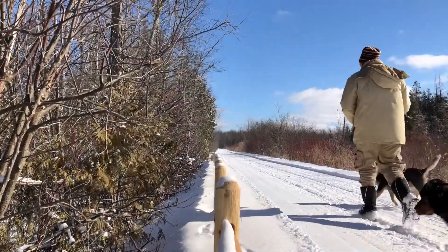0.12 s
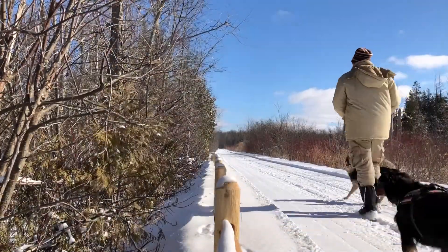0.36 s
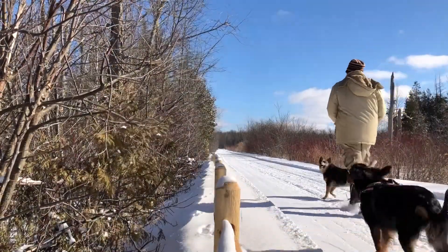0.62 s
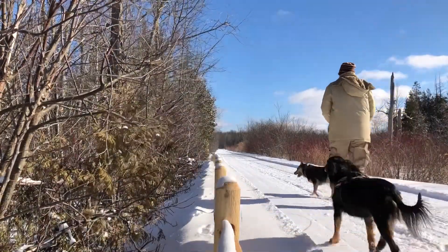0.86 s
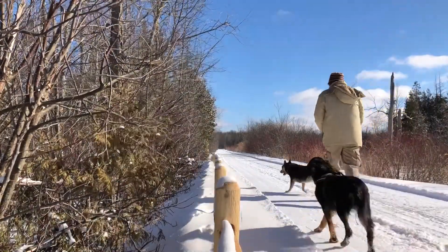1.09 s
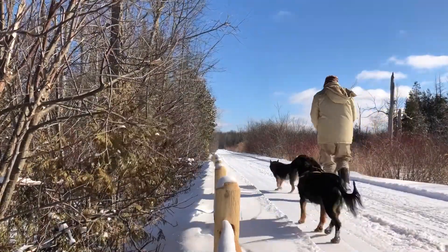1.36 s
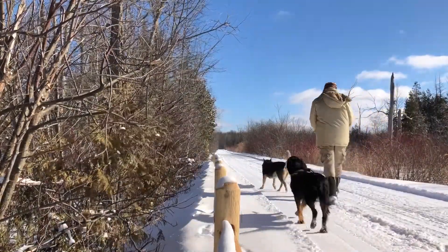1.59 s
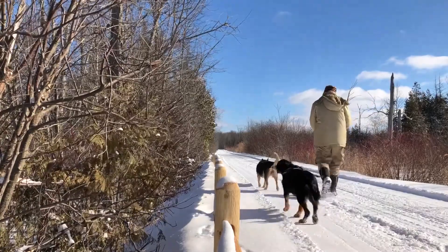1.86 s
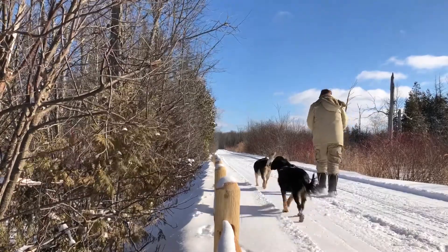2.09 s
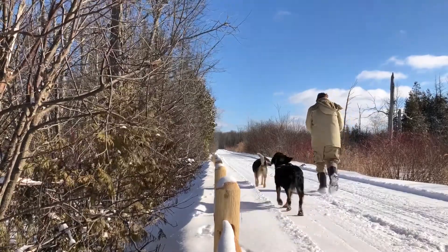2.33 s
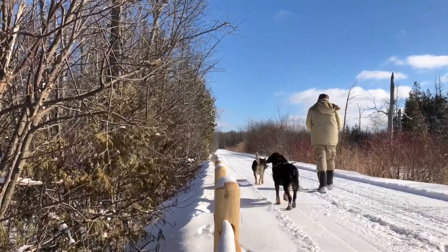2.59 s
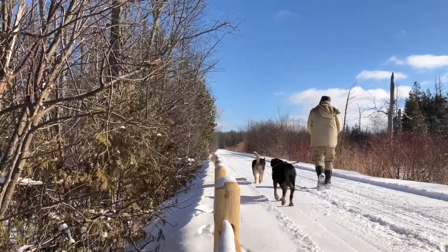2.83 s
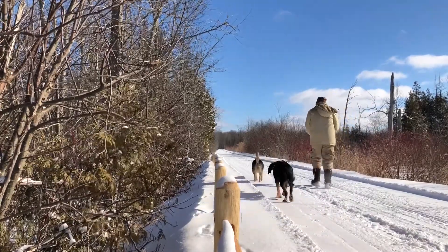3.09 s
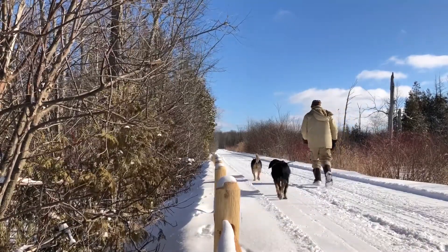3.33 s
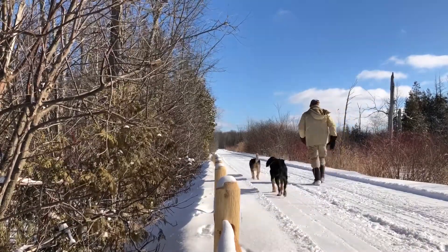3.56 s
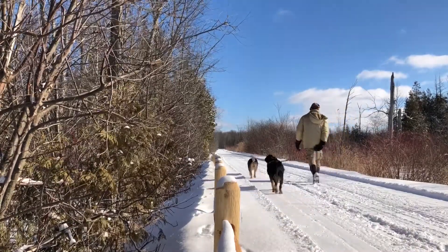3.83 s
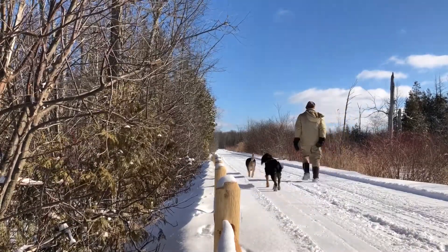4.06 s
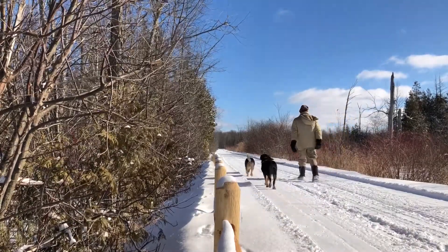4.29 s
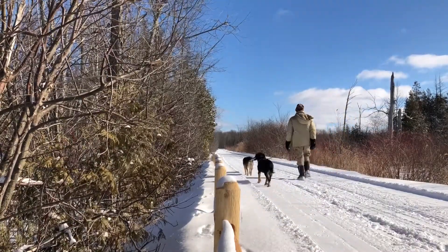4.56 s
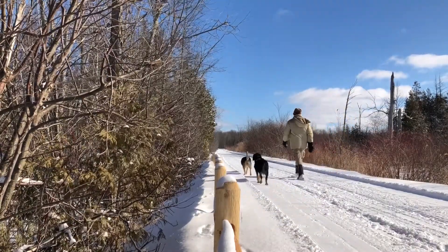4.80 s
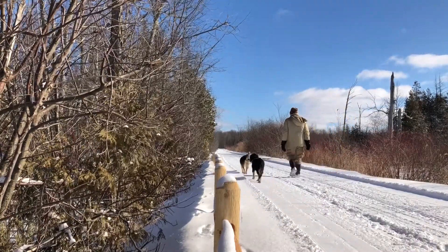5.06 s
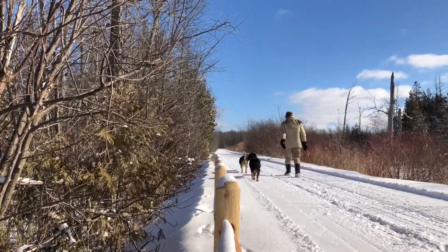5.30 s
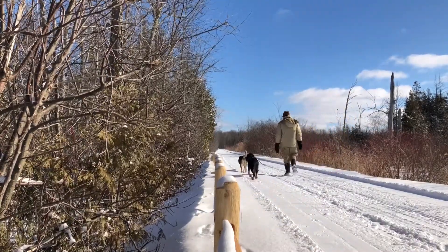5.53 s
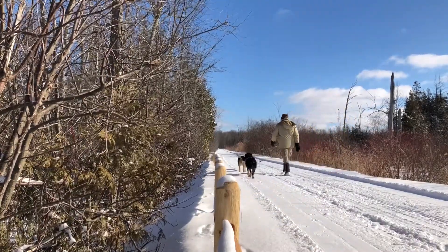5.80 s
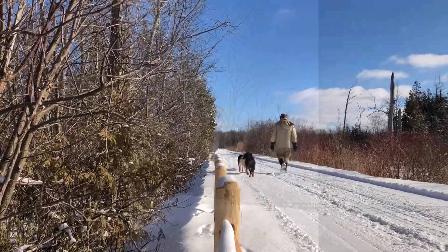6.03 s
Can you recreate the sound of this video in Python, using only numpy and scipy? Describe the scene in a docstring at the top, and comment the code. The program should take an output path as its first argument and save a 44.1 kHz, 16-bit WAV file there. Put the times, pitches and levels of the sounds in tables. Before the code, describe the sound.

A walker and two dogs pass and head away over packed snow: crisp crunches, a slight squeak, cloth and snow rustle, and delicate high metallic jingling close at first. Irregular low wind gusts thud and crackle directly on the microphone, often covering the steps, strongest in the middle. After four seconds the wind eases and distant footfalls remain as faint ticks in open air, with one last soft gust.

```python
"""Windy walk with two dogs

Gusty wind rumbles and slaps a hand-held microphone beside a snowy trail: filtered noise plus short swirling tones.
A walker and two dogs move away: noise bursts crunch like packed snow and rough tones squeak.
Their coats and kicked snow rustle as grainy noise that fades unevenly, and decaying high tones jingle as collar tags.
A soft, steady noise behind it all is the outdoor hush."""
import sys
import numpy as np
from scipy import signal
from scipy.io import wavfile
from scipy.ndimage import uniform_filter1d, minimum_filter1d

SR = 44100
rng = np.random.default_rng(int(sys.argv[2]) if len(sys.argv) > 2 else 0)


def convert_level_to_amplitude(level_db):
    """Map a level in decibels to its linear amplitude factor."""
    exponent = np.asarray(level_db, float) / 20
    return 10 ** exponent


def bounce(signal):
    """Save signal as a 16-bit WAV file at the path given by the first command-line argument."""
    frames = np.transpose(np.atleast_2d(signal))
    limited = np.clip(frames, -1, 1)
    pcm = np.round(limited * 32767).astype(np.int16)
    wavfile.write(sys.argv[1], SR, pcm)


N = 271479  # length in samples

# Steady wind flow at the microphone port. Each row: time in seconds, rumble level in dB.
BREEZE = [(0.0, -45.5), (0.1, -33.5), (0.65, -33), (0.98, -43.5), (1.15, -29.5), (1.6, -27), (1.78, -40.5),
          (1.9, -29.5), (2.06, -40.5), (2.3, -29), (2.74, -32), (3.0, -30), (3.27, -35.5), (3.62, -31.5),
          (3.88, -42.5), (4.5, -47), (5.0, -48), (5.35, -43.5), (5.57, -59), (5.85, -37), (6.16, -59)]


def evened(x):
    """Scales a sound to an average (rms) strength of 1."""
    return x / np.sqrt(np.mean(x ** 2) + 1e-20)


def read(points, hz):
    """Reads a spectrum at hz, with straight lines on a logarithmic frequency axis."""
    f, value = np.transpose(points)
    return np.interp(np.log(hz + 1), np.log(f + 1), value)


def add(mix, s, sound):
    """Adds a sound to the mix at s seconds, cut off where the mix ends."""
    part = mix[round(s * SR):][:len(sound)]
    part += sound[:len(part)]


def noise(points, size, patchy_db=0.0, grain=None):
    """Gives noise, or a given train of grains, a spectrum with drifting louder and softer patches; rms 1."""
    x = rng.standard_normal(N) if grain is None else grain
    hz, _, z = signal.stft(x, SR, nperseg=size, noverlap=size * 3 // 4)
    patches = uniform_filter1d(rng.standard_normal(z.shape), size=6, axis=0)
    patches = uniform_filter1d(patches, size=6, axis=1)
    z = z * convert_level_to_amplitude(read(points, hz)[:, None] + patchy_db * evened(patches))
    shaped = signal.istft(z, SR, nperseg=size, noverlap=size * 3 // 4)[1]
    return evened(shaped[:N])


def lumps(seconds, depth_db):
    """Makes a random loudness curve that swells over about the given time; rms 1."""
    width = max(round(seconds * SR), 2)
    swell = uniform_filter1d(uniform_filter1d(rng.standard_normal(N), width), width)
    return evened(convert_level_to_amplitude(depth_db * evened(swell)))


def swells(rows):
    """Adds up the power of bell-shaped swells, for a main layer and the brighter one that goes with it."""
    t = np.arange(0, N + 64, 64) / SR  # a coarse time grid is enough for these slow curves
    power = 0
    for s, db, half, bright_db in rows:
        bell = np.exp(-2 * ((t - s) / max(half, 0.003)) ** 2)
        power = power + convert_level_to_amplitude([[db], [db + bright_db]]) ** 2 * bell
    return [np.interp(np.arange(N) / SR, t, row) for row in power]


def wind():
    """Slow eddies of air rumble; fast ones come in lumps and grow quickly as the flow strengthens."""
    # Spectra of the two kinds of eddy. Each row: frequency in Hz, relative level in dB.
    slow_eddies = [(12, -43.5), (20, -28), (49, 0), (98, -2), (195, -14.5), (300, -29), (338, -33),
                   (500, -56), (650, -58), (1100, -120)]
    fast_eddies = [(59, -38), (100, -6.5), (197, -4.5), (407, -5.5), (447, -13.5), (481, -4), (539, -16),
                   (1200, -42), (1560, -76.5), (2640, -120)]
    # Gusts over the breeze. Each row: peak time in seconds, rumble level in dB, half length in seconds,
    # fast eddies relative to the rumble in dB.
    gusts = [(0.18, -28.5, 0.022, -16), (0.27, -34, 0.016, -12), (0.375, -20, 0.01, -17),
             (0.75, -29, 0.024, 3.5), (0.82, -23, 0.037, -8), (0.89, -30.5, 0.017, 3),
             (0.93, -22.5, 0.017, -16), (1.01, -29.5, 0.021, -15), (1.085, -22, 0.015, -17),
             (1.29, -22, 0.048, -6), (1.43, -23.5, 0.032, 0), (1.53, -24, 0.045, -3.5),
             (1.6, -44, 0.045, 5), (1.67, -25, 0.045, -11.5), (1.83, -22.5, 0.031, -21),
             (1.96, -20.5, 0.026, -41), (2.17, -27, 0.066, -11), (2.39, -26.5, 0.053, -8),
             (2.65, -23.5, 0.052, -12.5), (2.8, -22.5, 0.035, -16), (2.9, -25, 0.047, -16),
             (3.13, -14, 0.022, -9.5), (3.23, -25, 0.023, -8), (3.37, -16, 0.051, -16),
             (3.52, -20, 0.051, -21), (3.725, -16.5, 0.02, -18), (3.8, -26, 0.03, -25),
             (3.91, -28, 0.015, -30), (4.09, -37.5, 0.018, -25), (4.21, -29.5, 0.021, -28),
             (4.33, -37.5, 0.085, -38), (4.56, -31.5, 0.024, -29), (4.73, -34.5, 0.084, -30),
             (5.19, -38.5, 0.11, -43), (5.94, -30.5, 0.073, -27), (6.09, -35.5, 0.039, -34)]
    breeze_db = np.interp(np.arange(N) / SR, *np.transpose(BREEZE))
    slow_gust, fast_gust = swells(gusts)
    fast_db = -52 + 1.7 * (breeze_db + 35)  # -52 dB at a rumble of -35 dB, then 1.7 dB per dB of rumble
    slow_strength = np.sqrt(convert_level_to_amplitude(breeze_db) ** 2 + slow_gust)
    fast_strength = np.sqrt(convert_level_to_amplitude(fast_db) ** 2 + fast_gust)
    slow = noise(slow_eddies, size=8192) * lumps(0.048, 0.89) * slow_strength
    fast = noise(fast_eddies, size=4096) * lumps(0.008, 4) * fast_strength
    return slow + fast


def slaps(rows, count=16):
    """Each eddy arrives fast and slows down: a thin sharp edge first, then a longer, heavier body."""
    # Where body, middle and edge of a slap lie. A single row: their three frequencies in Hz.
    slap_hz = (204, 528.7, 1465)
    body_hz, middle_hz, edge_hz = slap_hz
    lead = 0.02  # seconds kept free ahead of the slap
    out = np.zeros(N)
    t = np.arange(3000) / SR - lead
    chance = rng.random((len(rows), 3, count, 1))
    for (s, db, body_db, edge_db), (tune, phase, scatter) in zip(rows, chance):
        # swirls spread over 140 to 2900 Hz in equal musical steps
        hz = 140 * (2900 / 140) ** ((np.arange(count)[:, None] + tune) / count)
        slope = [(body_hz, body_db), (middle_hz, 0), (edge_hz, edge_db), (2 * edge_hz, 2.8 * edge_db)]
        span = 0.0032 * (middle_hz / hz) ** 0.64  # seconds; big swirls last longer
        lag = 0.00316 * (middle_hz / hz - 1) + 0.5 * span * (scatter - 0.5)  # seconds; low swirls come later
        tone = np.sin(2 * np.pi * (hz * (t - lag) + 0.63 * phase))
        swirls = convert_level_to_amplitude(read(slope, hz)) * np.exp(-((t - lag) / span) ** 2) * tone
        add(out, s - lead, convert_level_to_amplitude(db) * swirls.sum(0))
    return out


def strong_buffets():
    """Single strong eddies slap the microphone port at set moments."""
    # Each row: time in seconds, level in dB, low body relative to the middle in dB,
    # high edge relative to the middle in dB.
    strong_eddies = [(0.0883, -40, 4.5, -35), (0.1244, -45, 15, -28), (0.2804, -31, 4, -39),
                     (0.3523, -45.5, 18, -29), (0.3703, -40, -10, -39), (0.4545, -36.5, 8.5, -23),
                     (0.4746, -44, 9, -43), (0.5221, -49, 18, -8), (0.567, -51, 23, -7),
                     (0.6558, -49.5, 27, -13), (0.7053, -35.5, 12.5, -25), (0.7339, -27, 2, -38),
                     (0.7534, -28, 6, -37), (0.781, -21.5, 1, -49), (0.7916, -26, -1, -52),
                     (0.7165, -31, 1, -37), (0.8146, -39, 11, -26), (0.8459, -37.5, 22.5, -26),
                     (0.8878, -33, 3, -20), (1.0849, -41, 18.5, -30), (1.1077, -41, 9.5, -36),
                     (1.1447, -52, 21, -11), (1.1748, -41.5, 23.5, -37), (1.222, -41.5, 24.5, -27),
                     (1.25, -25.5, 11.5, -51), (1.2634, -10, -6, -39), (1.2695, -25.5, 3, -15.5),
                     (1.2992, -29, 5.5, -23), (1.3076, -14.5, -4.5, -41), (1.3168, -30, 7, -18),
                     (1.3285, -20.5, -4, -29), (1.358, -47, 21, -25), (1.4149, -23, -9, -32),
                     (1.4471, -28, -5, -32), (1.484, -31, 2, -25), (1.504, -34, 11, -31),
                     (1.5132, -36, 12, -35), (1.5326, -47, 6, -19), (1.5559, -17, -8, -28),
                     (1.5655, -14, -1.5, -29.5), (1.577, -26.5, 5, -26), (1.6017, -33, 3, -32),
                     (1.6143, -34, -1, -23), (1.659, -33, 0, -29), (1.8325, -38.5, -1, -41),
                     (2.07, -53.5, 20.5, -25), (2.108, -34, 3, -30), (2.166, -43.5, 18, -36),
                     (2.193, -52, 15, -31), (2.2524, -38, 13, -44), (2.2732, -29, -0.5, -39),
                     (2.321, -40.5, 18, -37), (2.348, -37, 14, -37), (2.3827, -25.5, 7, -54),
                     (2.402, -31, 10.5, -35), (2.509, -44, 15.5, -42), (2.645, -28, 4, -22),
                     (2.6677, -30, 7, -25), (2.7039, -24, 7, -36), (2.788, -45.5, 19.5, -35),
                     (2.8864, -31.5, 8, -47), (3.0298, -48.5, 21.5, -27), (3.0511, -39, 8, -31),
                     (3.0697, -43, 15, -28), (3.084, -42, 11, -28), (3.121, -18.5, 2, -15.5),
                     (3.1472, -31, -8, -20.5), (3.1964, -28.5, 11.5, -21.5), (3.213, -25.5, -7, -45),
                     (3.233, -39.5, 10.5, -32), (3.3192, -33.5, 11.5, -42), (3.3518, -22.5, 5, -27.5),
                     (3.371, -33, -1, -17), (3.385, -32, -6, -30), (3.4045, -16.5, -5.5, -37),
                     (3.4355, -13, -11.5, -20.5), (3.4902, -28, 2, -28), (3.5179, -19.5, -1, -44),
                     (3.6574, -25, -15, -40), (3.7027, -39, 6.5, -33), (3.7168, -25, 5.5, -23),
                     (3.8017, -23, -1, -42), (3.8744, -42, 9, -25), (3.8915, -49, 18.5, -20),
                     (4.544, -56, 18, -18), (5.885, -37.5, 3.5, -36), (5.9264, -46, 21, -25),
                     (5.9422, -29, 7.5, -61), (6.079, -51, 16, -20)]
    return slaps(strong_eddies)


def small_buffets(count=110):
    """Many small eddies slap at random moments, stronger and sharper when the breeze is strong."""
    when, size = rng.random((count, 2)).T
    s = 0.03 + when * (N / SR - 0.03)
    breeze_db = np.interp(s, *np.transpose(BREEZE))
    # A slap gains 1.6 dB per dB of breeze: in calm air little but the dull body is left.
    dulled_db = (1.6 - 1) * (breeze_db + 35)
    db = breeze_db + dulled_db - 15 - 2.5 * np.log(size + 0.025)  # a few come out much stronger
    body_db = 8.5 - 0.54 * dulled_db
    return slaps([(a, b, c, -33.5) for a, b, c in zip(s, db, body_db)])


def jingles(rows, modes):
    """The clasp ticks, then thin metal rings at its own pitches; a swinging tag makes each ring waver."""
    out = np.zeros(N)
    t = np.arange(6000) / SR
    chance = rng.random((len(rows), len(modes), 3))
    ticks = rng.standard_normal((len(rows), 200))
    for (s, *piece_db), draws, tick in zip(rows, chance, ticks):
        add(out, s, convert_level_to_amplitude(piece_db[0]) * np.diff(tick) * np.exp(-t[:199] / 0.00093))
        for (hz, db, t60, piece), (phase, tune, swing) in zip(modes, draws):
            waver = 1 + 0.23 * np.sin(2 * np.pi * (45 * t + swing))  # 45 times a second
            tuned_hz = hz * (1 + 0.008 * (tune - 0.5))
            ring = np.sin(2 * np.pi * (tuned_hz * t + phase)) * waver
            onset = 1 - np.exp(-t / 0.00036)
            fading = convert_level_to_amplitude(piece_db[round(piece)] + db - 60 * t / t60)
            add(out, s, fading * onset * ring)
    return out


def collar_tags():
    """Strikes set the metal on both dogs' collars ringing, each collar with its own pitches."""
    # Ringing pitches of each collar. Each row: frequency in Hz, level in dB, time to fall by 60 dB in seconds,
    # piece (0 clasp, 1 first tag, 2 second tag).
    near_modes = [(9700, 1.5, 0.017, 0), (15300, -7, 0.067, 2), (10360, -2, 0.15, 1), (11790, 0, 0.063, 2)]
    far_modes = [(8840, -2, 0.084, 1), (9050, 2, 0.039, 1), (8600, 2, .06, 2), (14050, -14, .04, 0),
                 (14620, -11, .04, 0), (15000, -17, .05, 0), (15600, -15, .04, 0)]
    # Strikes on the nearer and the other dog's collar. Each row: start in seconds, clasp level in dB,
    # first tag level in dB, second tag level in dB.
    near_strikes = [(0.0894, -53, -56, -65), (0.2144, -66, -67, -53), (0.312, -38, -49, -51),
                    (0.397, -60, -53, -51), (0.427, -58, -53, -74), (0.5122, -52, -54, -62),
                    (0.5484, -41.5, -53, -44), (0.5901, -48, -60, -49), (0.7382, -55, -66, -47),
                    (0.8135, -39, -41.5, -45), (0.8839, -57, -53, -48), (0.9, -57, -54, -63),
                    (0.9344, -65, -66, -60), (1.2436, -61, -59, -64)]
    far_strikes = [(0.0528, -55, -57, -75), (0.2594, -62, -78, -62), (0.8839, -56, -78, -57),
                   (1.8437, -47, -59, -75), (1.8594, -59, -62, -75), (2.2593, -72, -68, -80),
                   (2.482, -62, -64, -78), (2.505, -52, -54.5, -70), (2.8295, -60, -59, -75),
                   (5.572, -52, -58, -77), (5.9773, -58, -72, -80), (6.119, -61, -77, -80)]
    return jingles(near_strikes, near_modes) + jingles(far_strikes, far_modes)


def crunches():
    """Snow crystals break in bursts, coloured by the hollow under the foot; long bursts start softly."""
    # Snow packing down and crust snapping under boots and paws. Each row: start in seconds, level in dB,
    # centre frequency in Hz, treble relative to the level in dB, decay length in seconds.
    footfalls = [(0.183, -42, 3460, 1, .012), (0.343, -44, 3220, -23, 0.033), (0.637, -50, 4400, 0, .015),
                 (0.7195, -40.5, 3300, -20, 0.0032), (0.846, -47, 2700, -37, 0.0088),
                 (0.9085, -37.5, 1870, -20, 0.0049), (0.919, -47, 2400, -29, .0014),
                 (1.113, -48.5, 3360, -23, 0.0016), (1.1712, -46, 3870, -35, 0.018),
                 (1.327, -58, 2520, -24, .002), (1.5429, -51, 2800, -14, 0.0037),
                 (1.995, -53, 2500, -24, .017), (2.0153, -37, 2970, -29, 0.011),
                 (2.0245, -37, 2900, -18.5, 0.011), (2.033, -38, 3580, -23, 0.006),
                 (2.71, -53, 5500, -8, .004), (2.787, -51, 3500, -10, 0.0035),
                 (2.829, -44.5, 3640, -14, 0.00099), (2.8624, -50.5, 2740, -27, 0.002),
                 (2.9715, -57, 5000, 8, .0006), (3.1725, -40, 3600, -1, 0.00065),
                 (3.862, -53, 4400, -31, .0027), (3.9649, -54, 6900, -15, 0.0087),
                 (4.421, -47.5, 2240, -30, 0.0032), (5.023, -54, 3540, -37, .005),
                 (5.1523, -39, 3220, -19, 0.0011), (5.16, -50, 2520, -31, 0.0059),
                 (5.229, -45, 3300, -40, 0.00089), (5.3487, -56, 4680, -32, 0.0081),
                 (5.404, -53, 4200, -32, .0011), (5.441, -53, 5070, -24, .002),
                 (5.882, -62, 3800, -26, .01), (5.9414, -49, 2470, -17, 0.0023),
                 (6.116, -53, 4600, -20, .0018)]
    out = np.zeros(N)
    t = np.arange(4096) / SR
    size = np.minimum(rng.exponential(1, (len(footfalls), 4096)), 3)
    breaks = rng.standard_normal((len(footfalls), 4096)) * convert_level_to_amplitude(3 * size)
    spray = signal.butter(2, 6500, "high", fs=SR, output="sos")
    for (s, db, hz, treble_db, length), grain in zip(footfalls, breaks):
        hollow = signal.butter(2, [hz / 1.56, hz * 1.5], "band", fs=SR, output="sos")
        u = t / max(length, 0.0005)
        rise = 0.48 * (length / 0.005) ** 0.46  # as a share of the decay length
        shape = (1 - np.exp(-u / rise)) * np.exp(-u ** 1.09)
        dull = evened(signal.sosfilt(hollow, grain))
        bright = convert_level_to_amplitude(treble_db) * evened(signal.sosfilt(spray, grain))
        burst = shape * (dull + bright)
        # every burst gets the energy of its shape, whatever the random grains
        add(out, s, convert_level_to_amplitude(db) * burst * np.linalg.norm(shape) / np.linalg.norm(burst))
    return out


def squeaks():
    """Crystals slipping in step under a sole give short tones with a rough, drifting pitch."""
    # Cold snow squeaking. Each row: start in seconds, peak level in dB, pitch in Hz, length in seconds.
    slips = [(0.225, -71, 3800, 0.045), (0.637, -56, 4450, 0.027), (2.422, -67, 2250, .02),
             (2.44, -62, 1970, 0.026)]
    out = np.zeros(N)
    wobble = rng.standard_normal((len(slips), 4096))
    for (s, db, hz, length), chance in zip(slips, wobble):
        t = np.arange(0, min(length, 0.09), 1 / SR)
        drift = 1 + 0.024 * evened(uniform_filter1d(chance, size=120))[:len(t)]
        tone = np.sin(2 * np.pi * hz * np.cumsum(drift) / SR)
        add(out, s, convert_level_to_amplitude(db) * np.sin(np.pi * t / length) * tone)
    return out


def rustle():
    """Dense tiny grains of friction form a bed that follows the movement, with swishes on top."""
    # Coats, fur and loose snow, fading as the group walks off. Each row: time in seconds, level in dB.
    movement = [(0.0, -59.5), (0.5, -64), (0.9, -61.5), (1.1, -67.5), (2.0, -66), (2.35, -70), (3.0, -69.5),
                (3.4, -64.5), (4.0, -69.5), (5.2, -69), (6.16, -70)]
    # Swishes of cloth and kicked snow. Each row: peak time in seconds, level in dB, half length in seconds,
    # treble relative to the level in dB.
    swishes = [(0.0, -75, .015, 22), (0.19, -59, .015, -3), (0.37, -67, 0.044, 14), (0.55, -79, .01, 13),
               (0.63, -57.5, 0.044, -17), (0.74, -76, .01, 6), (0.84, -74, 0.026, 15),
               (0.9, -57.5, 0.038, -6), (1.185, -64.5, 0.014, 16), (1.33, -66.5, 0.052, 4),
               (1.45, -68, 0.013, 0), (1.6, -66, 0.038, -3), (1.855, -77, 0.0093, 11), (1.91, -70, 0.03, 6),
               (2.025, -64, 0.025, 8), (2.505, -62.5, .02, -3), (2.72, -67, 0.033, -10),
               (3.17, -64, .05, -8), (3.55, -64.5, 0.044, -10), (3.75, -68, .05, -2), (4.0, -68, 0.037, 1),
               (5.16, -62, .02, -13), (5.58, -61, 0.017, -8), (5.98, -70, 0.019, -5),
               (6.125, -64.5, 0.028, -1)]
    # Moments when this faint hiss is turned down. Each row: start in seconds, end in seconds,
    # level change in dB, further change of the treble in dB.
    hiss_drops = [(0.755, 0.806, -5, -8), (3.62, 3.704, -5, 1), (4.026, 5.165, -6.5, -4)]
    t = np.arange(N) / SR
    bed = convert_level_to_amplitude(np.interp(t, *np.transpose(movement))) ** 2  # as power
    mid_swish, treble_swish = swells(swishes)
    mid_drop_db, treble_drop_db = np.zeros(N), np.zeros(N)
    for start, end, db, more_db in hiss_drops:
        active = uniform_filter1d(1.0 * ((t > start) & (t < end)), size=400)  # softened ends
        mid_drop_db += db * active
        treble_drop_db += (db + more_db) * active
    grain_db = 2.0 * np.minimum(rng.exponential(1, N), 4)
    grain = rng.standard_normal(N) * convert_level_to_amplitude(grain_db) * lumps(0.003, 0.32)
    # spectra as (Hz, relative dB)
    mid_spectrum = [(900, -5.0), (2200, -5.0), (4500, -6), (8000, -13.5), (12000, -21.0)]
    treble_spectrum = [(4000, -27), (7000, -9.0), (12000, -5.0), (16000, -1.5)]
    mid = noise(mid_spectrum, size=256, patchy_db=3.0, grain=grain)
    treble = noise(treble_spectrum, size=256, patchy_db=4.5, grain=grain)
    swell = lumps(0.02, 1.0)
    mid_strength = np.sqrt(bed * swell ** 2 + mid_swish)
    treble_strength = np.sqrt(bed * convert_level_to_amplitude(-4.5) ** 2 * swell ** 3 + treble_swish)  # bed treble 4.5 dB lower
    return mid * mid_strength * convert_level_to_amplitude(mid_drop_db) + treble * treble_strength * convert_level_to_amplitude(treble_drop_db)


def hush():
    """Far-off air in bare trees blends into a smooth wash of noise."""
    # Spectrum of the distant air. Each row: frequency in Hz, relative level in dB.
    hush_spectrum = [(88, -34), (150, -12.5), (297, -14), (348, -16), (376, -17.5), (1080, -23),
                     (1790, -31), (1980, -33.5), (2700, -36.5), (16000, -59)]
    return convert_level_to_amplitude(-58) * noise(hush_spectrum, size=1024, patchy_db=1.4)


def scene():
    """Adds all sources together into one channel."""
    air = wind() + strong_buffets() + small_buffets() + hush()
    group = collar_tags() + crunches() + squeaks() + rustle()
    return (air + group)[None]


def low_pass(x):
    """Removes everything above the highest recorded frequency."""
    return signal.sosfilt(signal.butter(12, 16810, fs=SR, output="sos"), x)


def record(dry):
    """The microphone rolls off the deepest rumble and the top treble; a limiter holds the hardest slaps."""
    low_cut = signal.butter(4, 42, "high", fs=SR, output="sos")
    top_cut = signal.firwin(255, 15850, window=("kaiser", 5), fs=SR)
    heard = signal.oaconvolve(signal.sosfilt(low_cut, dry), top_cut[None], "same")
    # turn down around peaks above 0.6, with smooth changes
    room_left = minimum_filter1d(np.minimum(1, 0.6 / (abs(heard) + 1e-9)), 600)
    gain = uniform_filter1d(uniform_filter1d(room_left, 300), 300)
    return low_pass(heard * gain)


dry = scene()
out = record(dry)
bounce(out)
```